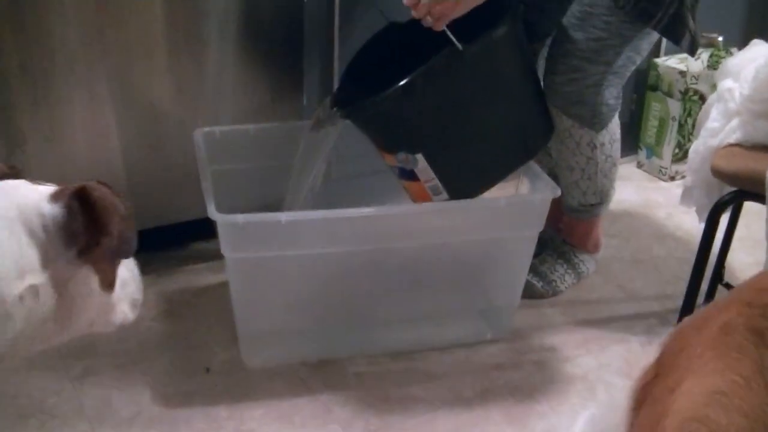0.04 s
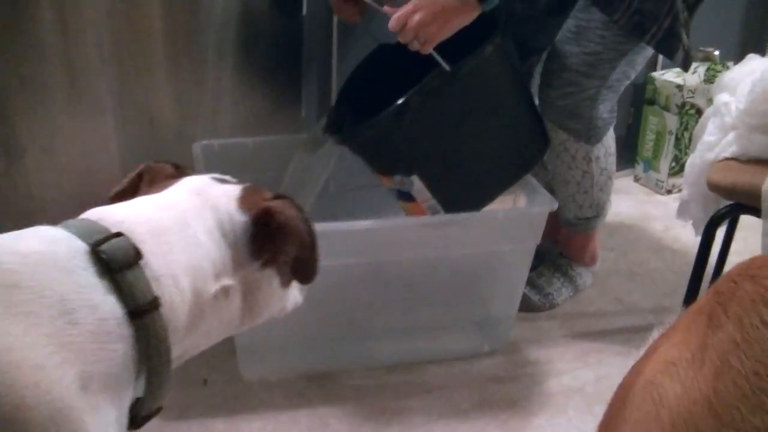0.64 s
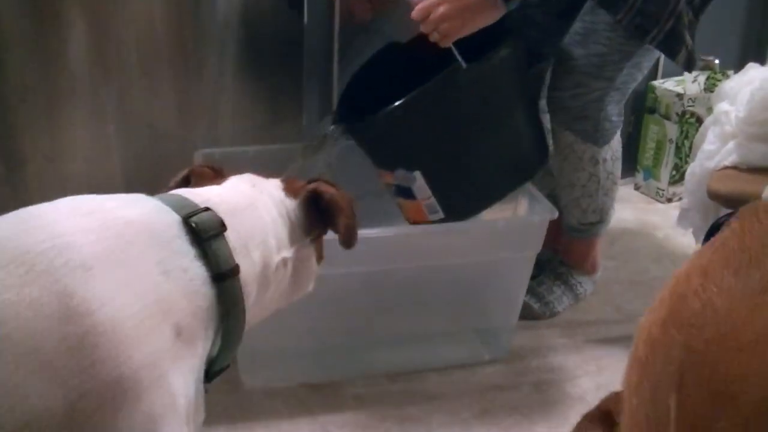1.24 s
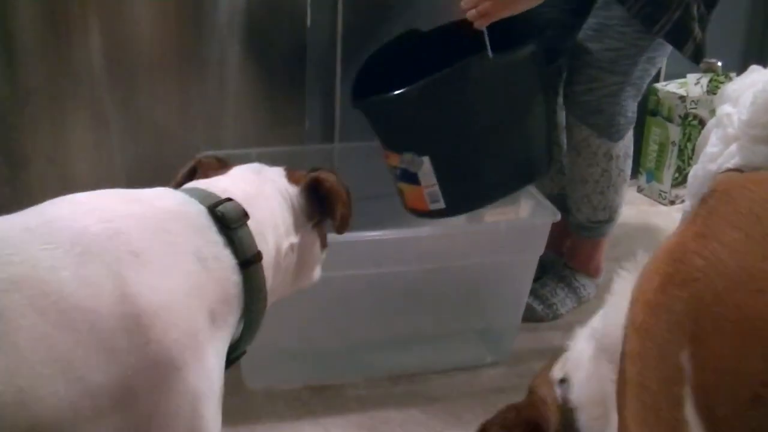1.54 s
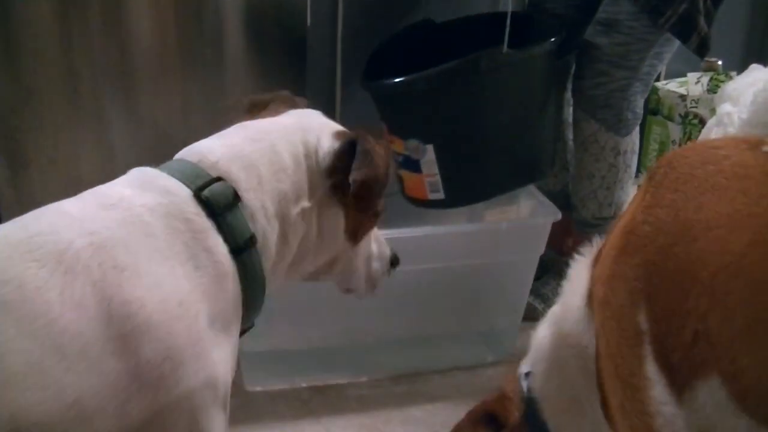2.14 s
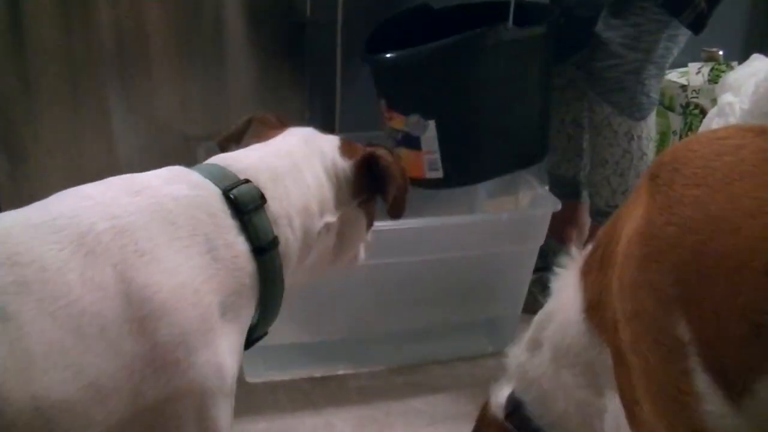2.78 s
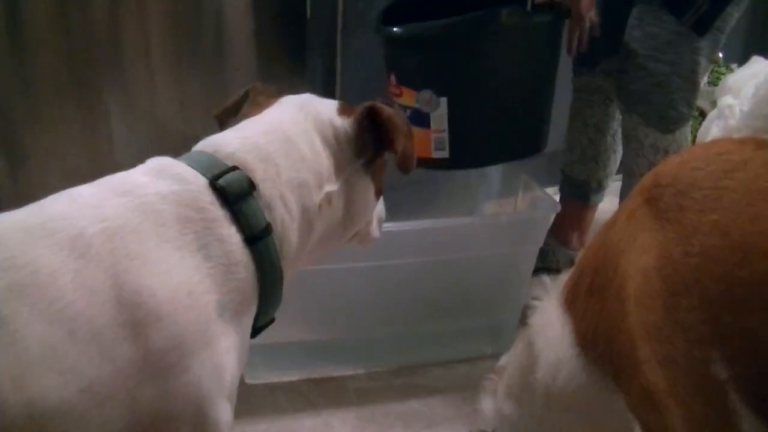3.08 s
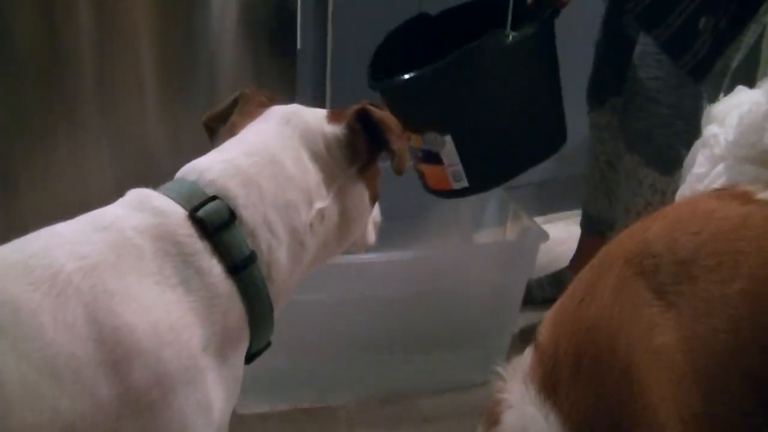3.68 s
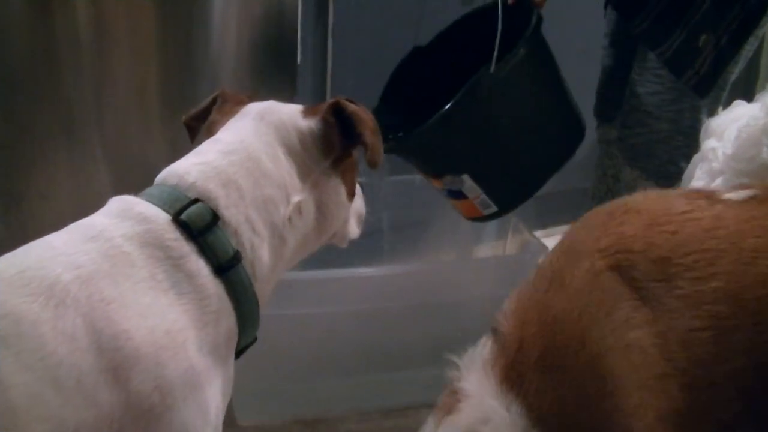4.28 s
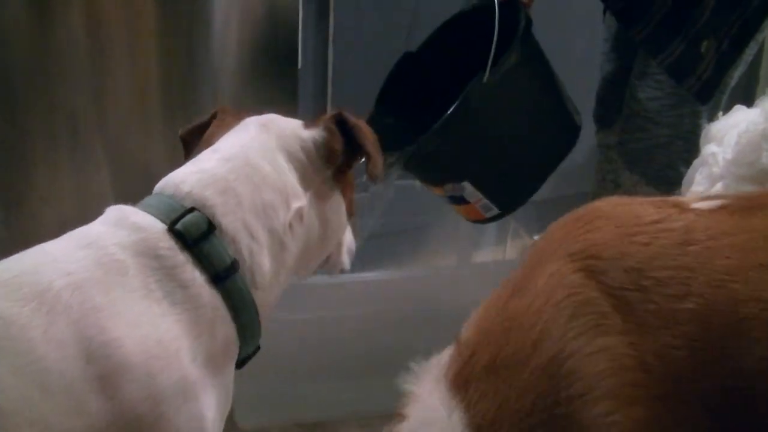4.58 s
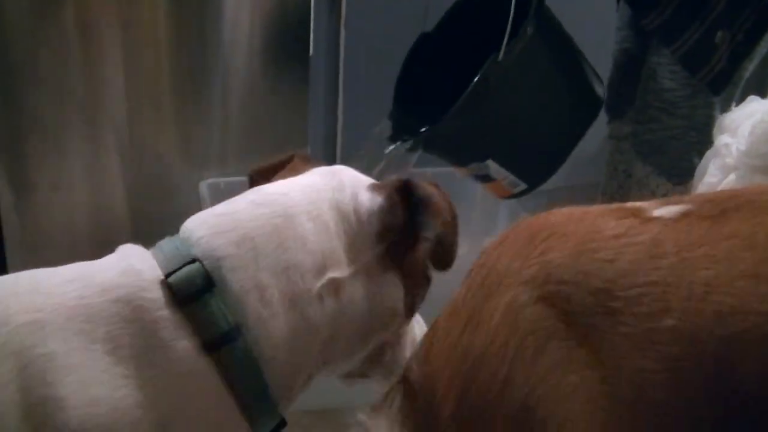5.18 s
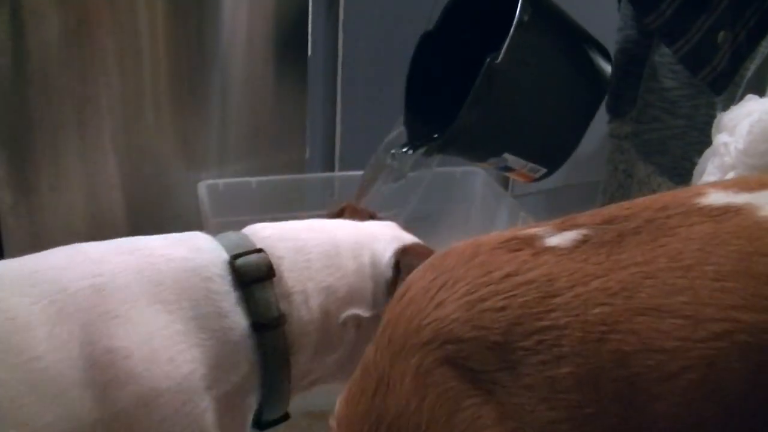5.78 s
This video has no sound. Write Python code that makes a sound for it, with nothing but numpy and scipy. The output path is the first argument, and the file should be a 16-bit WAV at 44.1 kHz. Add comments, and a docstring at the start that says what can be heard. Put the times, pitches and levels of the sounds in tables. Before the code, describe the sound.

Water pours from a bucket into a plastic tub from the start, an uneven stream that drums on the hollow plastic with splashes, fine spray and small ringing bubbles. At about 1.8 seconds it thins to a faint dribble with a few drips. Around 3.3 seconds the water sloshes and gurgles in the bucket, and clothing brushes very softly twice just before 4 seconds. At about 4.1 seconds water slaps down again and a thin stream starts. Two sharp, hollow plastic knocks come in quick succession at about 4.5 and 4.6 seconds, the loudest moments. A fuller, louder stream follows at once, splashing and bubbling, easing slightly as it runs on to the end near 5.8 seconds. Everything sounds close and centred in a small hard-walled room with a short echo, and a fan hums quietly throughout.

```python
"""Water runs from a bucket into a plastic tub in a small hard-walled room: drops and ringing bubbles
drum, splash and spray. The stream thins to a dribble and the water sways in the bucket, then slaps
down again. Clothing brushes as the bucket tips, hollow plastic knocks twice, and a fuller stream
follows. A fan hums quietly behind it all."""
import sys
import numpy as np
from scipy import signal
from scipy.fft import rfft, irfft
from scipy.io import wavfile

SR = 44100
rng = np.random.default_rng(int(sys.argv[2]) if len(sys.argv) > 2 else 0)


def inscribe(sig):
    """Save sig as 16-bit PCM at rate SR to the path in sys.argv[1].

    A 1-D sig is mono; a 2-D sig holds one channel per row.
    Samples are clipped to [-1, 1] before scaling.
    """
    pcm = np.round(np.clip(np.atleast_2d(sig).T, -1, 1) * 32767)
    wavfile.write(sys.argv[1], SR, pcm.astype(np.int16))


N = 256662
HZ = np.fft.rfftfreq(N, 1 / SR)


def stream():
    """Drop impacts and bubbles drum on the tub, splash and spray; the stream breaks into clumps."""
    # tone of the running water: f/Hz, level/dB
    tone = [(59, -72), (100, -42), (162, -22.5), (279, -7.5), (513, -8), (582, 1.5), (718, 1.5), (1000, -1),
            (1110, -3.5), (1290, -4.5), (1490, -3), (2990, -8), (3460, -9.5), (10700, -29.5),
            (15000, -35.5)]
    drumming = unit(drops(1500, 2.5)) + amp(-8) * froth(283.8, 1421, per_s=350, spread_db=.5, cycles=49)
    splashing = unit(drops(3500, 2.2))
    splashing += amp(-9.5) * froth(1192, 4330, per_s=1300, spread_db=3.5, cycles=32)
    fizz = amp(-2) * froth(3800, 14000, per_s=1800, spread_db=3.5, cycles=50, count=28)
    pings = amp(-8.5) * froth(3920, 12460, per_s=260, spread_db=2, cycles=84, count=24)
    spray = unit(drops(7000, 1.4)) + fizz + pings
    jumps = spatter(per_s=26, fade_s=.011)
    clumps_db = .8 * wander(rate_hz=14)
    # texture, low edge/Hz, high edge/Hz, spatter depth/dB
    layers = [(drumming, 120, 1300, 2), (splashing, 1300, 4000, 4), (spray, 4000, 16000, 6.4)]
    out = np.zeros(N)
    for (grains, lo, hi, spatter_db), gain in zip(layers, flow()):
        band = 1 / np.sqrt((1 + (lo / (HZ + 1)) ** 10) * (1 + (HZ / hi) ** 10))
        uneven = grains * amp(clumps_db + spatter_db * jumps)
        out += gain * unit(tub(colour(uneven, band * amp(read(tone, HZ)))))
    return out


def flow():
    """Envelopes of drumming, splashing and spray: the steady pour plus lumps that swell and die away."""
    # the bucket is tipped, then lifted: t/s, splash level/dB
    first_pour = [(0, -41), (.2, -36.5), (.55, -36), (.7, -37), (1.2, -35.5), (1.41, -35.5), (1.6, -35),
                  (1.72, -36), (1.79, -62)]
    # the last dribble, then water swaying in the upright bucket: t/s, splash level/dB
    lull = [(1.76, -50), (1.9, -52.5), (2.1, -52.5), (2.5, -60), (2.72, -56.5), (3.25, -55.5),
            (3.58, -51.5), (3.7, -47), (4.1, -57.5)]
    # the bucket tips again, a thin stream and then a full one: t/s, splash level/dB
    second_pour = [(4.11, -45), (4.5, -36), (4.56, -27), (4.71, -25.5), (4.78, -30), (5.03, -25.5),
                   (5.16, -28.5), (5.48, -33), (5.66, -32), (5.82, -32)]
    # lumps falling all at once: t/s, rise/s, splash level/dB, drum vs splash/dB, spray vs splash/dB
    surges = [(.075, 0.018, -38, -14, 0.5), (.185, .022, -40.5, -13, -0.5), (.478, 0.018, -34.5, -17, -2.5),
              (.605, 0.019, -40.5, -4, 1.5), (.81, 0.021, -42.5, 9.5, -1), (.935, 0.016, -34.5, -6.5, -5),
              (1.025, 0.03, -35.5, -3, -4), (1.265, 0.018, -27.5, -1.5, -7.5),
              (1.595, 0.014, -35.5, 2.5, -4), (2.31, .04, -62, -6, 7), (3.289, 0.027, -32, -1.5, -6.5),
              (3.372, .012, -39, 5, -13), (3.405, 0.02, -40, 4, -6.5), (4.108, 0.012, -30.5, 3, -6.5),
              (4.14, 0.02, -30.5, -19.5, -8.5), (4.222, 0.017, -42.5, -11, 4), (4.36, 0.013, -41, -8, 2.5),
              (5.27, 0.014, -30, -4.5, -5), (5.39, 0.027, -31.5, -8, -5.5)]
    thin_db, spray_slope = -38, .21  # the thinner the stream, the larger its share of spray
    t, power = np.arange(N) / SR, np.zeros((3, N))
    for curve, drum_db, spray_db in [(first_pour, -4, -5.5), (lull, 1, -10), (second_pour, -3.5, -7)]:
        db = np.interp(t, *np.transpose(curve))
        inside_s = np.minimum(t - curve[0][0], curve[-1][0] - t)
        gate = np.clip(1 + inside_s / .03, 0, 1)
        power += (gate * amp([db + drum_db, db, db + spray_db + spray_slope * (thin_db - db)])) ** 2
    for s, rise, db, drum_db, spray_db in surges:
        age = np.clip((t - s) / rise, 0, 20)
        power += np.outer(amp([db + drum_db, db, db + spray_db]), age * np.exp(1 - age)) ** 2
    return np.sqrt(power)


def drops(per_s, spread_db):
    """Drop impacts: randomly timed clicks, mostly small and a few large."""
    size = amp(spread_db * np.minimum(rng.exponential(1, N), 4))
    return size * rng.choice([-1, 1], N) * (rng.random(N) < per_s / SR)


def bubble(hz, t60, rise, onset_s):
    """An air pocket rings and its pitch climbs as it nears the surface."""
    t = np.arange(int(t60 * SR) + 2) / SR
    chirp = np.sin(2 * np.pi * hz * t * (1 + rise * t / t60 / 2))
    return chirp * dying(t, t60) * (1 - np.exp(-t / onset_s))


def froth(lo_hz, hi_hz, per_s, spread_db, cycles, count=20):
    """A swarm of bubbles in count sizes; bubbles of one size come in clusters."""
    out, steps = np.zeros(N), np.arange(0, N + 1500, 1500)
    for hz in np.geomspace(lo_hz, hi_hz, count) * rng.uniform(.96, 1.04, count):
        ring = bubble(hz, cycles / hz, rise=.12, onset_s=.46 / hz)
        cluster_db = 2.34 * np.interp(np.arange(N), steps, rng.standard_normal(len(steps)))
        births = drops(per_s / count, spread_db) * amp(cluster_db)
        out += np.sqrt(hz) * unit(signal.oaconvolve(births, ring)[:N])
    return unit(out)


def spatter(per_s, fade_s):
    """Small blobs hit at random: an envelope that jumps and falls back."""
    blobs = rng.random(N) * (rng.random(N) < per_s / SR)
    return signal.lfilter([1], [1, -np.exp(-1 / SR / fade_s)], blobs)


def tub(x):
    """The hollow tub lifts its own resonances."""
    # tub resonances: f/Hz, width/Hz, lift/dB
    modes = [(318, 440, 2.5), (710, 49, 4), (1138, 47, 5.5), (1464, 53, 1), (2680, 81, 3.5),
             (3176, 14, 7.5)]
    return x + sum((amp(db) - 1) * signal.lfilter(*signal.iirpeak(hz, hz / width, SR), x)
                   for hz, width, db in modes)


def gurgles():
    """Water folds over and a cloud of like-sized bubbles rings at once."""
    # swells of churned bubbles: t/s, length/s, level/dB, centre f/Hz
    clouds = [(.28, 0.07, -35.5, 3350), (1.45, 0.24, -32, 2270), (3.296, .05, -24.5, 1110),
              (3.304, .06, -24.5, 1650), (3.301, 0.12, -33.5, 750), (3.396, 0.11, -38.5, 485),
              (3.428, 0.062, -39, 2040), (4.025, 0.046, -36, 402), (4.283, 0.068, -34, 2140),
              (4.421, 0.051, -35, 3420), (4.671, 0.051, -23.5, 1610)]
    out, births_per_s = np.zeros(N), 2500
    for s, length, db, hz in clouds:
        shape = swell(length)
        births = rng.standard_normal(len(shape)) * (rng.random(len(shape)) < births_per_s / SR)
        add(out, s, amp(db) * shape * tint(births, hz, octaves=.28))
    return out


def plops():
    """Large bubbles stand out of the stream, jostled by the water as they ring."""
    # single large bubbles: t/s, level/dB, f/Hz
    bubbles = [(.088, -28, 568), (.391, -6, 2906), (1.043, -23, 1920), (1.149, -22, 1120),
               (1.168, -22, 1200), (1.211, -19, 2970), (1.246, -21, 1475), (1.39, -24, 2530),
               (1.622, -28, 506), (2.072, -27, 685), (2.203, -36, 833), (2.719, -36.5, 640),
               (3.498, -31, 505), (3.616, -31, 1150), (3.98, -28, 868), (4.36, -23.5, 1513),
               (5.012, -19, 699)]
    out, cycles = np.zeros(N), 60  # each dies in this many cycles, so small ones are brief
    for s, db, hz in bubbles:
        add(out, s, amp(db) * bubble(hz, cycles / hz, rise=.1, onset_s=.0007))
    return out * (1 + .3 * wander(rate_hz=160))


def slaps():
    """Blobs of water land on wet plastic and sound the tub."""
    # landing blobs: t/s, level/dB, centre f/Hz, width/octaves, t60/s
    blobs = [(0.194, -21, 3040, 0.37, 0.068), (.649, -18.5, 3270, 0.7, .04), (.736, -14, 2550, 0.84, 0.064),
             (1.102, -24, 5500, 0.46, 0.033), (1.043, -21, 5000, .9, 0.032),
             (1.716, -20.5, 4030, .72, 0.044), (2.166, -38.5, 5770, 0.7, 0.094),
             (2.287, -28.5, 520, 0.59, 0.061), (2.285, -25, 3470, 1.2, 0.018),
             (3.29, -21, 1010, 0.79, .036), (3.378, -21.5, 3000, .77, .018), (3.405, -20, 2200, 0.85, .043),
             (3.466, -25.5, 3500, 0.7, 0.027), (3.501, -22.5, 1100, 1.1, 0.018),
             (3.922, -25, 1970, .25, 0.076), (3.946, -29.5, 4000, .76, .02), (3.979, -29, 4500, .6, .017),
             (4.026, -21.5, 1090, .72, 0.067), (4.1097, -16, 1490, 1.33, 0.15),
             (4.122, -11, 2260, 0.6, 0.084), (4.226, -16, 4220, 0.36, .04), (4.278, -13, 2000, 0.29, 0.037),
             (4.277, -14.5, 5700, 0.44, 0.012), (4.721, -9.5, 2500, 1.3, 0.012)]
    out = np.zeros(N)
    for s, db, hz, octaves, t60 in blobs:
        add(out, s, amp(db) * burst(hz, octaves, t60))
    return tub(out)


def knocks():
    """A sharp crack thrown back by near walls, a bright tick, then the hollow ring of the plastic."""
    # knocks on plastic: t/s, ring level/dB, crack level/dB, crack f/Hz, tick level/dB
    strikes = [(4.5260, -9.5, -0.5, 1000, -10), (4.5992, -10.5, -.7, 1600, -9)]
    # modes of the plastic: f/Hz, level/dB, t60/s
    modes = [(316, -30, 0.12), (455, -17, 0.28), (499, -6, 0.11), (674, -1.5, 0.084), (746, -1, 0.096),
             (868, -5.5, 0.49), (926, -2, 0.22), (952, 0.5, 0.18), (1036, -5.5, 0.22), (1420, -8, 0.076),
             (1502, -18.5, 0.28), (1930, 5.5, 0.027), (2000, -5, 0.041)]
    # reflections off the tub walls and the floor: delay/s, level/dB
    echoes = [(.0029, -19), (.0055, -35), (0.013, -14), (0.0163, -12), (.036, -8.5)]
    out, t = np.zeros(N), np.arange(SR // 2) / SR
    ring = sum(amp(db) * dying(t, t60) * np.sin(2 * np.pi * hz * t) for hz, db, t60 in modes)
    for s, ring_db, crack_db, crack_hz, tick_db in strikes:
        add(out, s, amp(ring_db) * ring * (1 - np.exp(-t / .0024)))
        add(out, s, amp(tick_db) * burst(4600, octaves=.58, t60=.022))
        age = t * crack_hz / .6  # the crack is a pulse of about three cycles
        crack = amp(crack_db) * np.sin(2 * np.pi * crack_hz * t) * age * np.exp(1 - age)
        for delay, db in [(.0006, 0)] + echoes:
            add(out, s + delay, amp(db) * crack)
    return out


def clothing():
    """Cloth brushes in soft high swishes as the bucket tips."""
    # swishes: t/s, length/s, level/dB
    rustles = [(3.658, 0.17, -50.5), (3.817, 0.17, -49)]
    out = np.zeros(N)
    for s, length, db in rustles:
        shape = swell(length)
        add(out, s, amp(db) * shape * tint(rng.standard_normal(len(shape)), hz=5450, octaves=.53))
    return out


def room(x):
    """Dense wall reflections, each band dying at its own speed."""
    # decay of the room: f/Hz, t60/s
    decay = [(150, 0.87), (600, 0.42), (2000, 0.43), (5000, 0.66), (14000, 0.52)]
    taps_per_s, predelay_s = 3000, .004
    taps = rng.choice([-1., 1.], SR) * (rng.random(SR) < taps_per_s / SR)
    taps *= np.arange(SR) > predelay_s * SR
    hz, t, bands = signal.stft(taps, SR, nperseg=256)
    _, tail = signal.istft(bands * dying(t, read(decay, hz)[:, None]), SR, nperseg=256)
    return signal.fftconvolve(x, tail / np.linalg.norm(tail))[:N]


def fan():
    """Steady low rush of a fan, slightly restless."""
    # tone of the fan: f/Hz, level/dB
    tone = [(18, -72), (30, -59), (99, -16), (180, -11), (304, 2.5), (394, 0), (511, -4), (774, -1.5),
            (905, 2), (1090, -17), (1690, -11.5), (1970, -12), (3680, -31), (10200, -32), (15000, -39)]
    level_db = -47.5 + 1.4 * wander(rate_hz=6.4)
    return amp(level_db) * unit(colour(rng.standard_normal(N), amp(read(tone, HZ))))


def burst(hz, octaves, t60):
    """A dying puff of noise about one pitch, with a wet, soft attack."""
    t = np.arange(SR // 5) / SR
    noise = tint(rng.standard_normal(len(t)), hz, octaves)
    return noise * dying(t, t60) * (1 - np.exp(-t / .0005)) / 2


def tint(x, hz, octaves):
    """Keeps the part of a short sound that lies about one pitch, top end softened; rms 1."""
    f = np.fft.rfftfreq(len(x), 1 / SR) + 1
    band = (1 + (np.log2(f / hz) / octaves) ** 2 / 2) ** -1.5
    return unit(irfft(rfft(x) * band / (1 + (f / 8000) ** 2), len(x)))


def swell(length):
    """A smooth rise and fall over length seconds, padded or cut to a fifth of a second."""
    t = np.arange(SR // 5) / SR
    return np.sin(np.pi * np.minimum(t / length, 1))


def dying(t, t60):
    """Exponential decay, 60 dB down at t60."""
    return np.exp(-np.log(1000) * t / t60)


def wander(rate_hz):
    """Smooth random drift of rms 1."""
    return unit(colour(rng.standard_normal(N), np.exp(-(HZ / rate_hz) ** 2)))


def colour(x, gain):
    """Filters a full-length sound by a gain per frequency."""
    return irfft(rfft(x) * gain, N)


def read(points, hz):
    """Reads a table on a log-frequency axis."""
    f, value = np.transpose(points)
    return np.interp(np.log(hz + 1), np.log(f + 1), value)


def add(mix, s, sound):
    """Mixes a sound in at time s."""
    part = mix[max(round(s * SR), 0):][:len(sound)]
    part += sound[:len(part)]


def amp(db):
    """Decibels to gain."""
    return 10 ** (np.asarray(db) / 20)


def unit(x):
    """Scales to rms 1."""
    return x / np.sqrt(np.mean(x ** 2) + 1e-20)


def scene():
    """Water and knocks sit near the centre; the walls and the fan give a little width."""
    # stereo width: f/Hz, side vs mid/dB
    width = [(30, -10), (120, -31), (500, -25.5), (1000, -33), (2000, -30), (4000, -74), (12000, -61)]
    # slight lean to the left: f/Hz, left vs right/dB
    balance = [(60, 0), (250, 1.0), (1000, .55), (4000, 0)]
    low_cut = signal.butter(3, 276, "highpass", fs=SR, output="sos")  # thin plastic radiates little bass
    water = stream() + gurgles()
    splats = signal.sosfilt(low_cut, plops() + slaps())
    hits = signal.sosfilt(low_cut, knocks())
    walls = room(amp(-6.5) * water + amp(-6) * splats + amp(-10) * hits)
    mid = water + splats + hits + walls + clothing() + fan()
    side = colour(room(mid), amp(read(width, HZ))) + amp(-23) * fan() + amp(-32) * room(hits)
    lean = amp(read(balance, HZ) / 2)
    return np.array([colour(mid + side, lean), colour(mid - side, 1 / lean)])


def record(dry):
    """A soft clip rounds the loudest peaks; a steep low-pass trims the very top."""
    rounded = dry / (1 + dry ** 16) ** (1 / 16)
    low_pass = signal.firwin(511, 15900, window=("kaiser", 9), fs=SR)
    return signal.oaconvolve(rounded, low_pass[None], "same")


dry = scene()
out = record(dry)
inscribe(out)
```